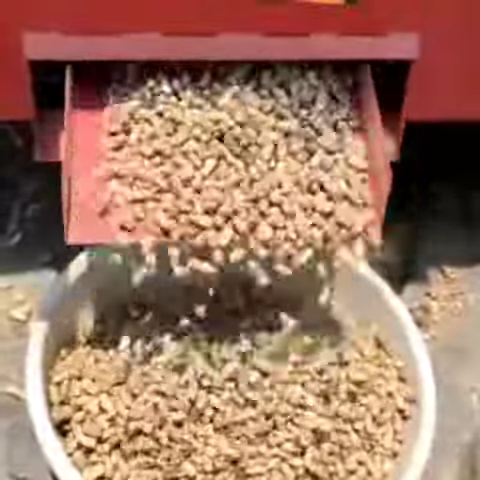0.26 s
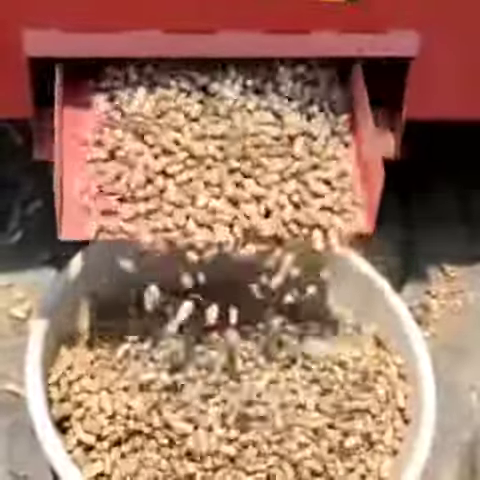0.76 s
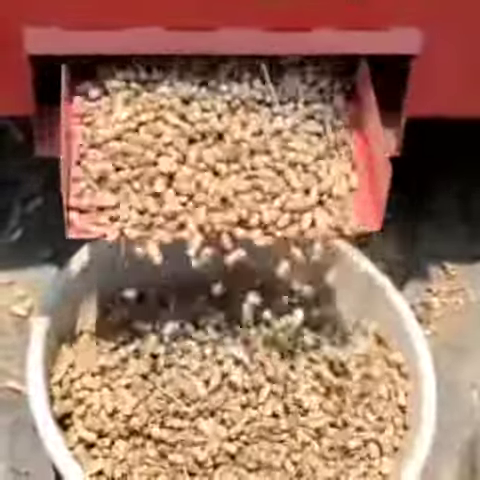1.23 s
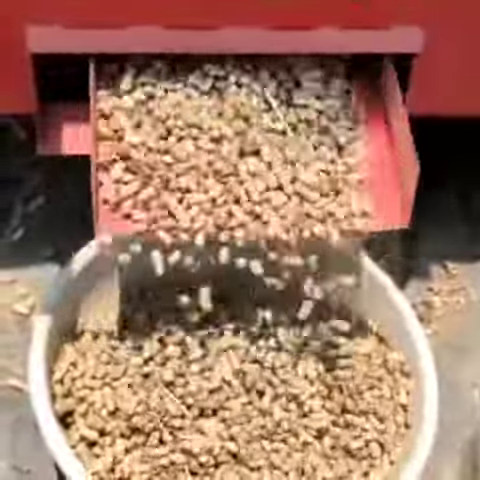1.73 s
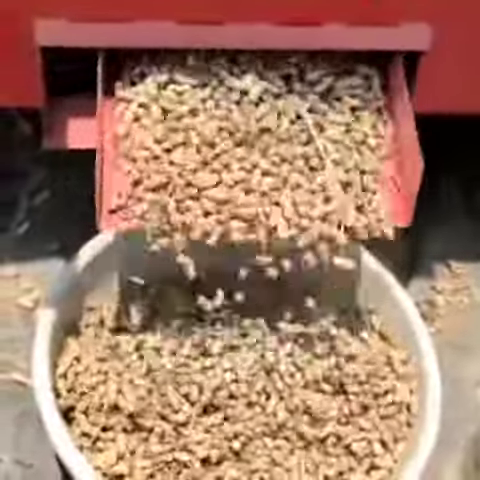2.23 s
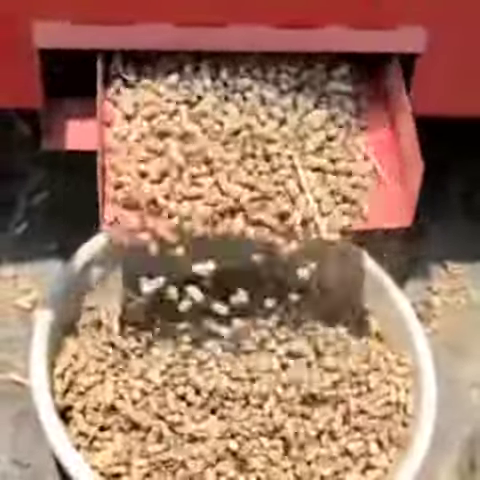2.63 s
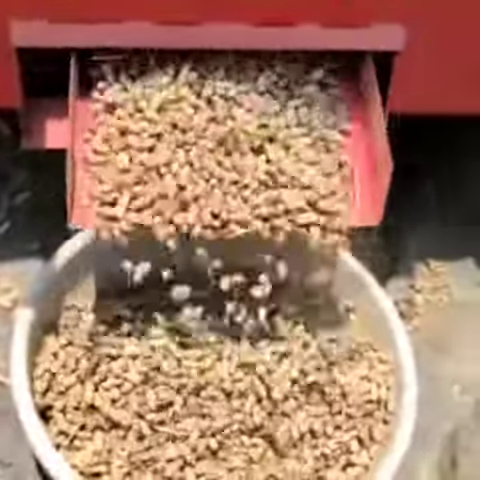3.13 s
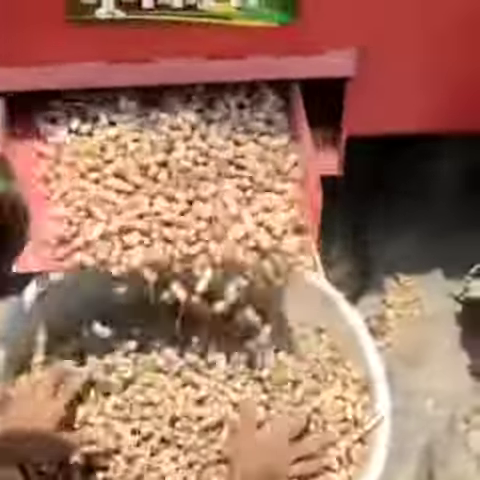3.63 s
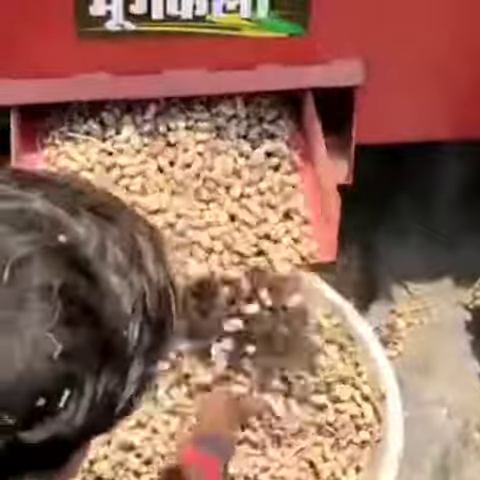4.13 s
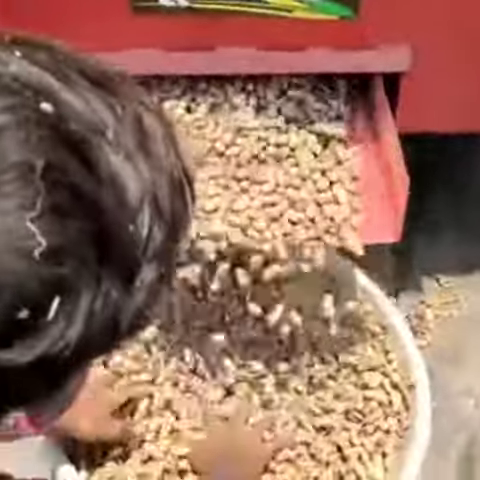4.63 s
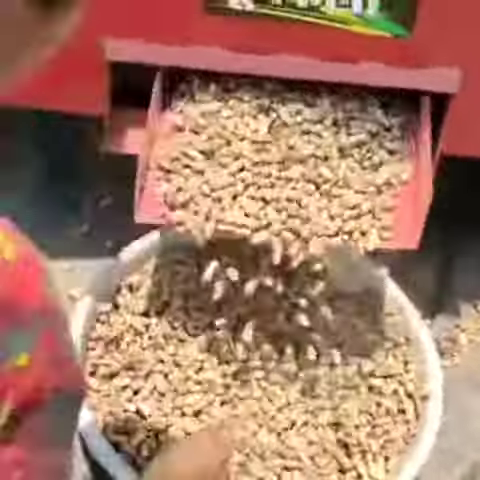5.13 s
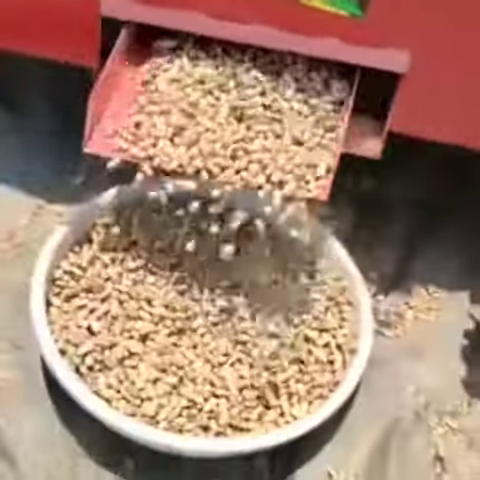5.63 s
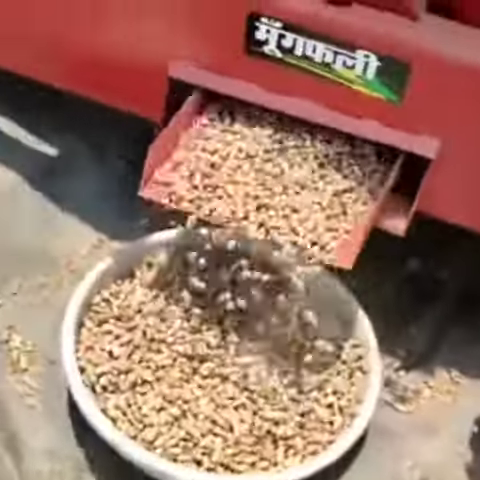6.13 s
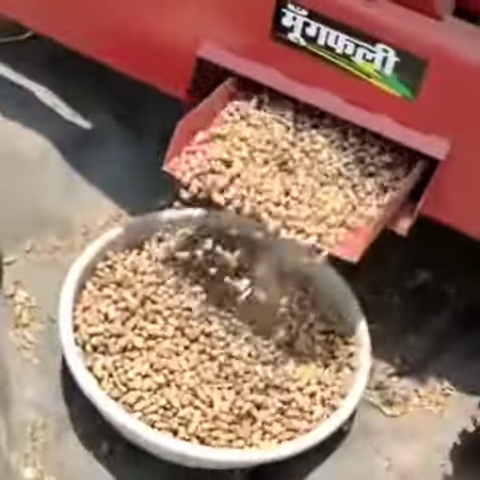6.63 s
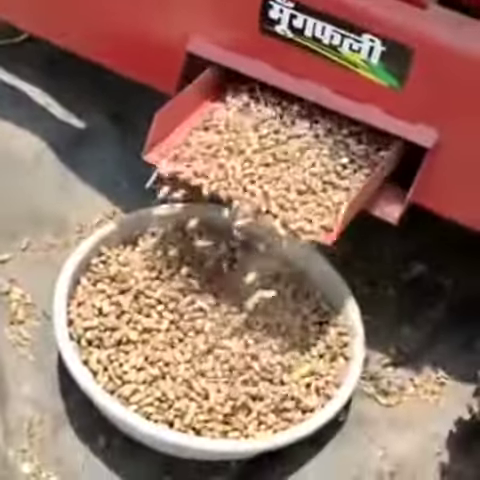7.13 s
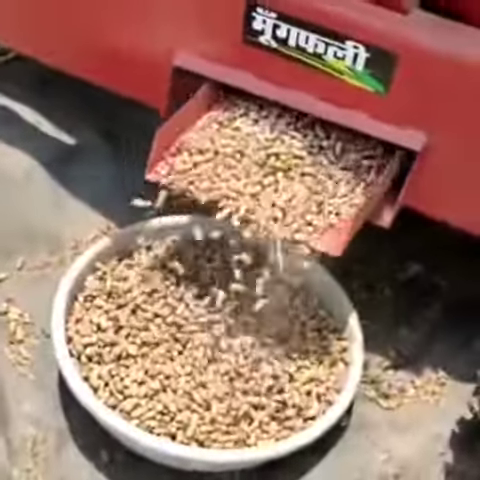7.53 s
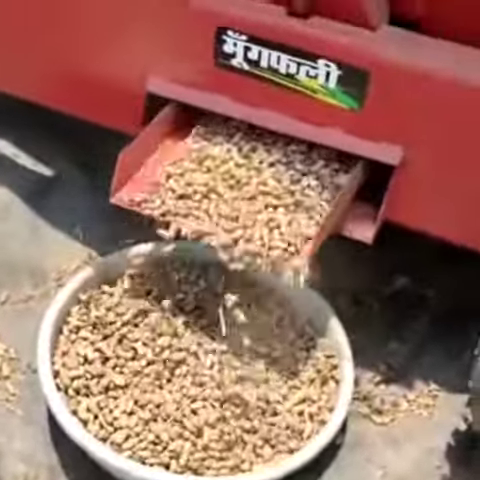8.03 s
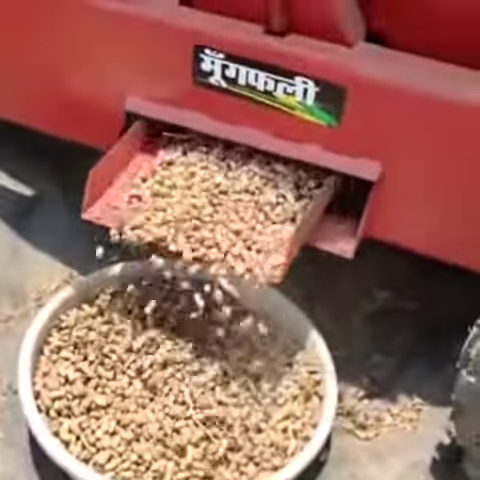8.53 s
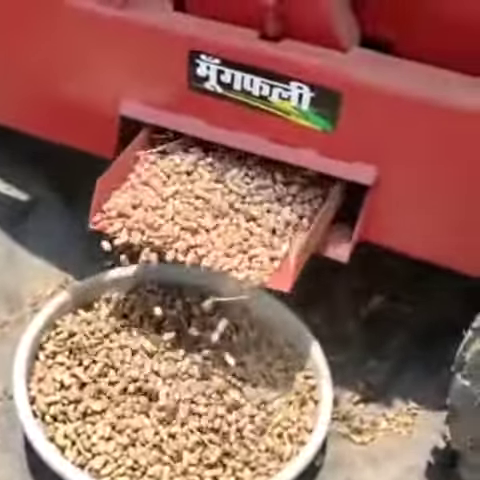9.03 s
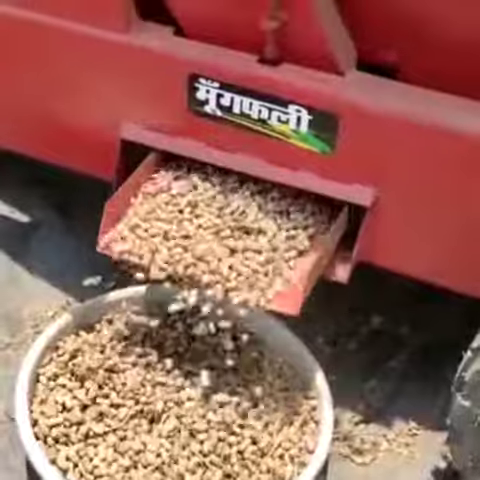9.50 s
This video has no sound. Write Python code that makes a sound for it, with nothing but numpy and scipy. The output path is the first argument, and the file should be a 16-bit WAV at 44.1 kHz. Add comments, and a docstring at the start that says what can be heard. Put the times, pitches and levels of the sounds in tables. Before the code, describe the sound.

Dry peanut pods click and patter down a metal chute while a farm threshing machine roars without a break. Its shaft and blower hum, its casing rings with quick, regular knocks, and fast puffs of air add a high hiss. The machine is heard outdoors, close at first, then from a step back and to the side, where the tone shifts a little but stays just as loud.

```python
"""A pod thresher at work

The machine runs steadily outdoors. Its shaft and blower hum, loose parts clack at fixed points of
each turn, and air puffs once a turn. Pods patter down the sheet-metal chute over the roar of drum
and blower. We listen through two microphones that step back and then round the chute."""
import sys
import numpy as np
from scipy import signal
from scipy.fft import rfft, irfft
from scipy.io import wavfile
from scipy.ndimage import uniform_filter1d, minimum_filter1d

SR = 44100
rng = np.random.default_rng(int(sys.argv[2]) if len(sys.argv) > 2 else 0)


def output_pcm(signal):
    """Save a mono or channel-first signal as 16-bit PCM at the path in sys.argv[1].

    Samples are clipped to [-1, 1] before scaling.
    """
    pcm = np.clip(np.atleast_2d(signal).T, -1, 1) * 32767
    wavfile.write(sys.argv[1], SR, np.round(pcm).astype(np.int16))


N = 430416
SECONDS = np.arange(N) / SR
HZ = np.maximum(np.fft.rfftfreq(N, 1 / SR), 1)
SHAFT_TURNS_PER_S = 17.192
SPOTS = [0, 1, 2]   # where we stand: close, back, aside

# The notes of each spinning part: (waves per turn [count], level close [dB], back [dB], aside [dB])
SHAFT_NOTES = [(4, -40, -34.5, -34.5), (5, -52, -46, -46), (7, -52, -43, -43), (8, -34, -32.5, -33.5),
               (10, -44, -37, -37), (11, -45, -44, -44), (12, -30.5, -37, -37), (13, -36, -36, -36),
               (14, -45, -41, -41), (15, -41, -46, -46), (16, -33, -34.5, -35), (17, -50, -38, -38)]
BLOWER_NOTES = [(1, -44, -38, -38), (8, -48, -36, -37), (9, -43, -48, -48), (28, -54, -35, -36)]

def hum(spot):
    """The main shaft holds its speed; the belt-driven blower wanders a little and slows."""
    shaft = tones(SHAFT_NOTES, SHAFT_TURNS_PER_S * SECONDS, spot, waver_db=1.2)
    blower_turns_per_s = (39.0 - .08 * SECONDS) * (1 + .0015 * drift(1.5))
    blower_turns = np.cumsum(blower_turns_per_s) / SR
    return shaft + tones(BLOWER_NOTES, blower_turns, spot, waver_db=1.5)


# The knocks in one turn: (point in the turn [0-1], ring level [dB], tick level [dB])
KNOCKS = [(.03, -1, -6), (.26, -0.5, -16), (0.328, -17, -4), (.38, 0, -10.5), (.5, -5.5, -12),
          (.59, -8, 1.5), (0.669, -1, -18), (.76, -7, -6), (.86, -10, -6.5), (0.958, -4, -5.5)]
# How the ring and the tick are spread from low to high: (pitch [Hz], level [dB])
RING_COLOUR = [(500, -17.5), (1000, -6), (2100, -3), (2700, -9), (3300, -32)]
TICK_COLOUR = [(1800, -24), (2700, -5.5), (4000, -7.5), (5500, -15.5), (8000, -37)]

def clacks():
    """Loose parts knock: each hit rings the metal casing and gives a brighter tick."""
    ring = sum(each_turn(at, db, rise_s=.00087, fall_s=.0029, spread_db=3.2, jitter_s=.00017)
               for at, db, _ in KNOCKS)
    tick = sum(each_turn(at, db, rise_s=.001, fall_s=.0032, spread_db=1.4, jitter_s=.0004)
               for at, _, db in KNOCKS)
    return shaped_noise(ring, RING_COLOUR) + shaped_noise(tick, TICK_COLOUR)


# The high hiss of the air: (pitch [Hz], level [dB])
PUFF_COLOUR = [(2000, -17.5), (3300, -10.5), (5200, -3.5), (10000, -2), (12500, -10)]

def air_puffs():
    """Air hisses out once a turn, slowly growing stronger and weaker."""
    puffs = each_turn(at=.31, level_db=0, rise_s=.007, fall_s=.019, spread_db=1.0, jitter_s=.0008)
    return shaped_noise(puffs * from_db(0.82 * drift(2.3)), PUFF_COLOUR)


# The bright click of a pod: (pitch [Hz], level [dB])
POD_COLOUR = [(500, -14), (1500, -14.5), (4000, -12.5), (9000, -5), (14000, -20)]

def falling_pods():
    """Pods land on the chute at random, in loose clumps; each makes a short dry click."""
    pods_per_s = 2500 * from_db(2.5 * drift(6.0))
    landings = rng.random(N) < pods_per_s / SR
    strength_db = 2.3 * np.minimum(rng.exponential(1, N), 4)   # many soft, a few loud
    clicks = fade(landings * from_db(strength_db) + 1e-18, time_s=.0016)
    return shaped_noise(clicks, POD_COLOUR)


# The roar, before casing and microphones shape it: (pitch [Hz], level [dB])
ROAR_COLOUR = [(30, 5.5), (300, -1.5), (700, -0.5), (2000, -1.5), (3300, -4.5), (5200, -3.5), (8500, -2.5),
               (11000, 6), (13000, 0)]

def roar():
    """Drum and blower make a broad rushing noise that wavers slightly."""
    return shaped_noise(from_db(.5 * drift(3.8) + 0.41 * drift(8.5)), ROAR_COLOUR)


# What reaches the microphones at each spot: (pitch [Hz], left level [dB], right level [dB])
HEARD_CLOSE = [(45, -67, -69), (120, -53.5, -54.5), (211, -43.5, -48), (327, -51, -49.5), (483, -51.5, -56),
               (715, -55, -61), (1000, -52.5, -54), (1470, -54.9, -53.5), (1614, -55.5, -54.5),
               (2142, -45, -36), (2706, -50.5, -46), (3250, -49.5, -53), (4240, -57, -57.5),
               (5220, -53.5, -51.5)]
HEARD_BACK = [(44.7, -56, -57), (120, -51, -51), (209, -41.5, -41.5), (337, -46, -46), (490, -51.5, -52),
              (700, -51.5, -53), (930, -52, -49.5), (1490, -56, -55.5), (1740, -49.5, -44),
              (2050, -46, -40), (2610, -56, -46.0), (3280, -50, -51.5), (4340, -56.5, -58.5),
              (5200, -56, -55.5)]
HEARD_ASIDE = [(45, -60.0, -58.5), (120, -50, -50), (210, -40.5, -42.5), (320, -46, -46),
               (486, -49.5, -54.5), (694, -51, -51), (1000, -52.5, -53.5), (1410, -54, -55),
               (1750, -49.5, -46), (2170, -44.0, -37), (2500, -56, -44), (3300, -48.5, -49),
               (4280, -59.5, -60.5), (5000, -56.5, -55)]
HEARD_HIGHS = [(6770, -61.5, -61), (8400, -70, -70.5), (11370, -83.5, -87.5), (11950, -81.5, -72),
               (12800, -71.5, -80), (14800, -75.5, -73.5)]   # the same at every spot
# Where the casing rings: (pitch [Hz], width [Hz], boost close [dB], back [dB], aside [dB])
CASING_RINGS = [(69, 18, 5, 7.5, 5), (307.5, 19, -1, 4.5, 5), (391.6, 13, 3.5, 0, 5.5),
                (578, 14, 1.5, 5, 1), (634, 130, -1, 0, 1.5), (715, 10, -0.5, 3, 6),
                (770, 90, -2, -0.2, -0.5), (962, 19, -2, 3.5, 7), (1078, 14, 2, -1, 4.5),
                (1132, 10, 5, 5, 2), (1170, 12, 2, 1, 5), (1390, 12, 2.5, -5, -5), (1906, 25, 3, 5.5, -2),
                (2046, 31, 3, 2.5, 5), (2123, 24, 4, 2, 5), (2263, 37, 3.5, 7.5, 0.5),
                (2856, 25, 0.5, 8, 6.5), (2970, 15, 2, 1, 2), (3240, 28, 4.5, 2, -2), (3330, 22, 6.5, 7, 7),
                (3460, 23, 5.5, 6, 0), (3420, 200, 2, -5.5, -2.5), (3650, 150, -1.5, -3, 1),
                (4050, 30, 5, 4, 4), (4360, 230, -0.5, -6, 1), (4690, 45, 7, 0, 1), (4850, 30, 2, -5, 8.5),
                (5110, 94, 3, 1, 6.5), (5300, 190, 1.5, 4.5, 2.5)]
# How well left and right match: (pitch [Hz], likeness close [0-1], back [0-1], aside [0-1],
# left's head start close [radians], back [radians], aside [radians])
EAR_MATCH = [(45, .92, .97, .95, 0, 0, 0), (210, .98, .98, .98, .1, .1, .1),
             (320, .9, .96, .96, .1, -.2, -.1), (480, .75, .7, .8, 1.2, .7, 1.2),
             (700, .66, .84, .85, .7, -.1, .2), (1000, .4, .4, .3, 1.2, .6, 1.1),
             (1400, .62, .25, .2, 1.9, 1.3, 1.8), (1750, .65, .84, .84, 1.9, 1.2, 1.6),
             (2130, .82, .86, .88, 1.5, 1.4, 1.4), (2600, .74, .3, .55, .3, 2.8, 0),
             (3300, .54, .3, .5, 0, -.1, -.4), (4200, .35, .4, .54, -.5, .2, -.1),
             (5200, .35, .4, .4, -1.1, -.8, .8), (6500, .25, .25, .36, -2.6, 3.1, -2.5),
             (8500, .25, .3, .2, -3.1, -2.9, -3.1), (11000, .07, .07, .09, 0, 0, 0),
             (12000, .25, .3, .2, 0, 0, 0), (15000, .1, .1, .1, 0, 0, 0)]

def microphones(spectrum, spot):
    """Left hears the direct sound; right hears a shifted share of it plus scattered sound."""
    direct, scattered = spectrum
    heard = (HEARD_CLOSE, HEARD_BACK, HEARD_ASIDE)[spot]
    left_db, right_db = over_pitch(list(heard) + list(HEARD_HIGHS))
    match = np.array(EAR_MATCH)
    alike = match[:, 1 + spot] * np.exp(-1j * match[:, 4 + spot])
    real, imag = over_pitch(np.c_[match[:, 0], alike.real, alike.imag])
    shared = real + 1j * imag
    right = shared * direct + np.sqrt(1 - abs(shared) ** 2) * scattered
    casing_db = sum(db[spot] / (1 + (2 * (HZ - hz) / width) ** 2) for hz, width, *db in CASING_RINGS)
    return irfft(from_db(casing_db + [left_db, right_db]) * [direct, right], N) * np.sqrt(SR / 2)


def tones(notes, turns, spot, waver_db):
    """Pure notes that follow a spinning part; how loud each is depends on where we stand."""
    out = 0
    for (multiple, *levels_db), start in zip(notes, rng.random(len(notes))):
        gain = np.interp(spot, SPOTS, from_db(levels_db)) * from_db(waver_db * drift(2.5))
        out = out + np.sqrt(2) * gain * np.sin(2 * np.pi * (round(multiple) * turns + start))
    return out


def each_turn(at, level_db, rise_s, fall_s, spread_db, jitter_s):
    """A loudness curve that rises and dies once a turn, a little different every time."""
    turns = np.arange(int(N / SR * SHAFT_TURNS_PER_S) + 1)
    time_luck, level_luck = rng.standard_normal((len(turns), 2)).T
    start_s = (turns + at) / SHAFT_TURNS_PER_S + jitter_s * time_luck
    starts = np.maximum((start_s * SR).astype(int), 0)
    hits = np.full(N + SR, 1e-18)
    hits[starts] = from_db(level_db + spread_db * level_luck)
    return fade(fade(hits, rise_s), fall_s)[:N]


def fade(hits, time_s):
    """Give every hit a tail that dies away."""
    return signal.lfilter([1], [1, -np.exp(-1 / (time_s * SR))], hits)


def shaped_noise(loudness, colour):
    """Two noises, direct and scattered, that follow a loudness curve; given pitch by pitch (a spectrum)."""
    return rfft(unit_level(loudness) * rng.standard_normal((2, N))) * from_db(over_pitch(colour)[0])


def drift(rate_hz):
    """A smooth random wobble, about 1 in size; a higher rate wobbles faster."""
    step, warm_up = 40, 2000
    pole = np.exp(-2 * np.pi * rate_hz * step / SR)
    noise = rng.standard_normal(N // step + warm_up + 2)
    slow = signal.lfilter([1], [1, -2 * pole, pole * pole], noise)[warm_up:]
    return np.interp(np.arange(N) / step, np.arange(len(slow)), unit_level(slow))


def over_pitch(rows):
    """Join a table's points into curves that cover every pitch."""
    hz, *columns = np.transpose(rows)
    return [np.interp(np.log(HZ), np.log(hz), column) for column in columns]


def unit_level(x):
    """Scale a signal so its typical size (rms) is 1."""
    return x / np.sqrt(np.mean(x ** 2) + 1e-20)


def from_db(db):
    """Turn decibels into a number to multiply by."""
    return 10 ** (np.asarray(db) / 20)


# Our walk round the chute: (time [s], spot [0 close, 1 back, 2 aside])
WALK_PATH = [(0, 0.21), (.8, 0.021), (4.6, 0.018), (5.57, 0), (5.63, .75), (6.3, 0.73), (6.9, 1.07),
             (8.4, 2), (9.76, 1.8)]
# How the bass swells and dips: (time [s], level [dB])
BASS_SWELL = [(0, 1.5), (.6, -0.5), (3.3, 0.5), (4.6, -2.5), (5.3, 2), (5.8, -1.5), (8.3, .5), (9.76, -3)]
# Small boosts to the treble and to the whole sound: (close [dB], back [dB], aside [dB])
TREBLE_BOOST = (0.26, -2.5, -1.1)
OVERALL_BOOST = (0.05, 0.7, -0.13)

def scene():
    """The whole machine, blended from spot to spot as we walk."""
    spot = np.clip(np.interp(SECONDS, *np.transpose(WALK_PATH)), 0, 2)
    machine = roar() + clacks() + air_puffs() + falling_pods()
    out = sum(np.clip(1 - abs(spot - k), 0, 1) * microphones(machine, k) for k in SPOTS)
    treble = signal.sosfilt(signal.butter(2, 4000, "high", fs=SR, output="sos"), out)
    treble_db = np.interp(spot, SPOTS, TREBLE_BOOST) + 1.3 * drift(9.8)   # the treble flickers
    out += (from_db(treble_db) - 1) * treble
    out += hum(spot) * from_db([[.8], [-.8]])   # a little louder on the left
    bass = signal.sosfilt(signal.butter(1, 400, fs=SR, output="sos"), out)
    bass_db = np.interp(SECONDS, *np.transpose(BASS_SWELL))
    out += (from_db(bass_db) - 1) * bass
    return from_db(np.interp(spot, SPOTS, OVERALL_BOOST)) * out


def record(dry):
    """The deepest bass and highest treble are cut, and the volume ducks around the loudest peaks."""
    low_cut_hz, high_cut_hz = 52, 15450
    duck_above, hold_samples = 0.86, int(0.0034 * SR)
    x = signal.sosfilt(signal.butter(4, low_cut_hz, "high", fs=SR, output="sos"), dry)
    peak = np.abs(x).max(axis=0) + 1e-9
    gain = minimum_filter1d(np.minimum(1, duck_above / peak) ** 0.62, size=hold_samples)
    x = x * uniform_filter1d(gain, size=hold_samples)
    return signal.sosfilt(signal.ellip(14, .5, 90, high_cut_hz, fs=SR, output="sos"), x)


dry = scene()
out = record(dry)
output_pcm(out)
```